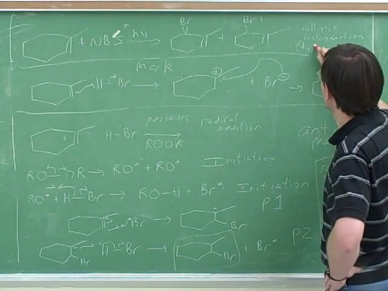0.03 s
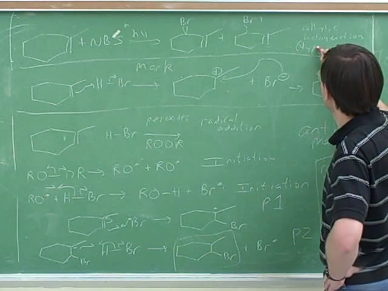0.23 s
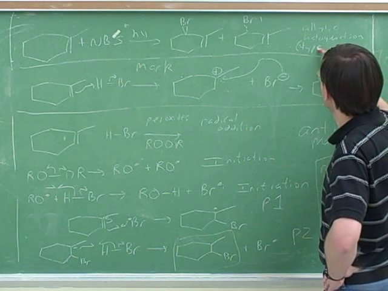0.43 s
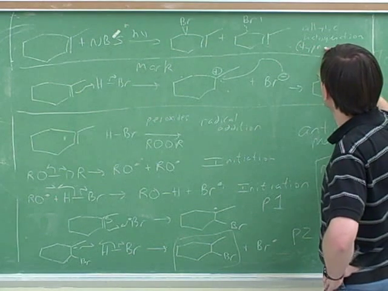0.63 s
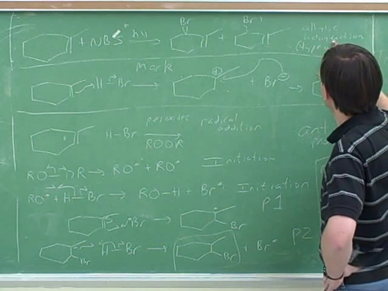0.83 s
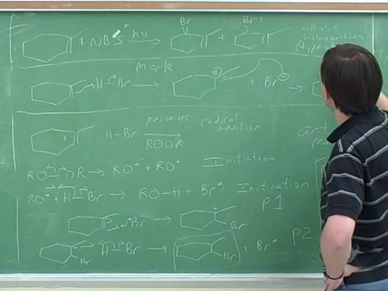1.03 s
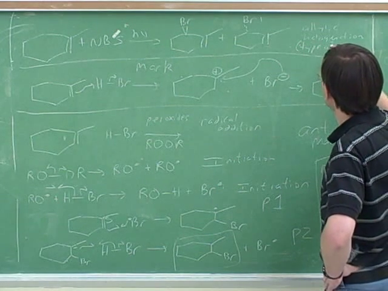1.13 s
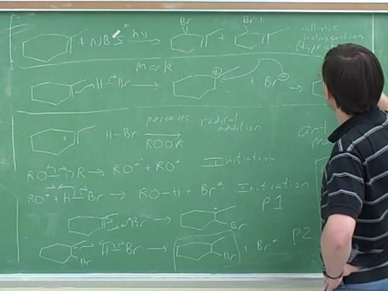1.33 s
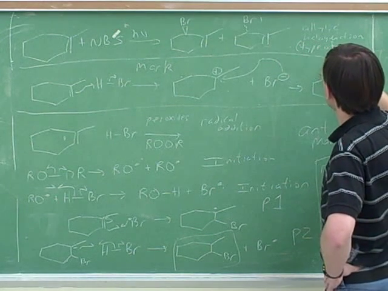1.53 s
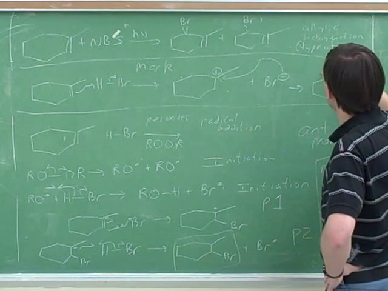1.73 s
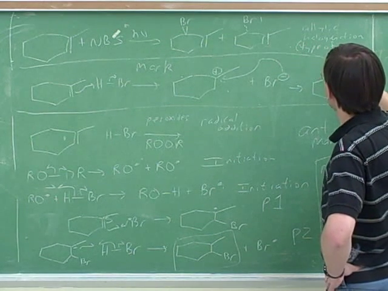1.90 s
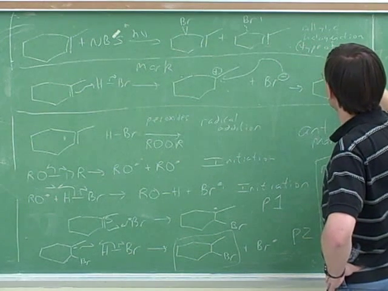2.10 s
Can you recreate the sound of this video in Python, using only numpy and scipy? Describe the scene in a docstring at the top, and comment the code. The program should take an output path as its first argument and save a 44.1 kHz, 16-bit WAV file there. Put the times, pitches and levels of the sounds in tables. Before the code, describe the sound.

Hard chalk taps on a blackboard, bright and clicky with a slight woody board ring, at about 0.05, 0.4, 0.73, 1.05, 1.31, 1.55, 1.84 and 2.12 seconds. The last is duller. Each brings quick echoes and a roughly half-second classroom tail; an earlier tap's tail is fading at the start. Faint ventilation hiss and wavering low rumble continue, with a deep thump around 2.1 seconds. Mono, roomy pickup.

```python
"""In a hard-walled classroom, a stick of chalk taps a blackboard about three times a second.
Each tap is a sharp, short pulse coloured by the ring of board and chalk, plus low board tones that linger.
The room answers with early echoes at set times (filtered pulses with a grainy trail) and a tail of
about half a second (fading noise). Ventilation hiss and low rumble, which ends in a deep thump,
lie beneath (shaped noise)."""
import sys
import numpy as np
from scipy import signal
from scipy.fft import rfft, irfft
from scipy.io import wavfile

SR = 44100
rng = np.random.default_rng(int(sys.argv[2]) if len(sys.argv) > 2 else 0)


def wrap_up_sound(samples):
    """Save the sound to the file named by the first command line argument, as 16-bit audio."""
    columns = np.atleast_2d(samples).T
    # keep every value between -1 and 1, then stretch to whole-number steps
    tamed = np.clip(columns, -1, 1)
    steps = np.round(tamed * 32767).astype(np.int16)
    wavfile.write(sys.argv[1], SR, steps)


N = 95344  # samples of finished sound
LEAD = SR // 2  # samples made before the start, then cut off
LENGTH = int(.7 * SR)  # samples of room answer computed per tap


def from_db(db):
    """Turn decibels into a gain."""
    return 10 ** (np.asarray(db) / 20)


def rms_one(x):
    """Scale a sound so that its average strength (rms) is 1."""
    return x / np.sqrt(np.mean(x ** 2) + 1e-20)


def at_hz(points, hz):
    """Read every column of a table at a frequency, spacing pitches evenly as the ear does."""
    points = np.array(points)
    log_hz = np.log(points[:, 0])
    return [np.interp(np.log(hz), log_hz, column) for column in points[:, 1:].T]


def band_pass(x, edges_hz):
    """Keep mainly the sound between two frequencies."""
    return signal.sosfilt(signal.butter(2, edges_hz, "band", fs=SR, output="sos"), x)


def third_octaves(white, low_hz, count):
    """Cut third-octave slices from two noises in turn; yield each centre frequency and slice."""
    edges = low_hz * 2 ** (np.arange(count + 1) / 3)
    for k, (low, high) in enumerate(zip(edges, edges[1:])):
        yield np.sqrt(low * high), band_pass(white[k % 2], [low, high])


def resonance(x, hz, width_hz):
    """Ring at one frequency, with gain 1 at the peak; a narrower width rings longer."""
    r = np.exp(-np.pi * width_hz / SR)
    feedback = [1, -2 * r * np.cos(2 * np.pi * hz / SR), r * r]
    return signal.lfilter((1 - r * r) / 2 * np.array([1, 0, -1]), feedback, x)


def steep_resonance(x, hz, width_hz):
    """The same resonance twice in a row falls off faster on both sides."""
    return resonance(resonance(x, hz, width_hz), hz, width_hz)


def click(level_db):
    """The most compact pulse with a given spectrum puts its energy first (minimum phase)."""
    cepstrum = irfft(np.log(from_db(level_db)))
    half = len(cepstrum) // 2
    # folding the second half onto the first leaves nothing before the start
    cepstrum[1:half] *= 2
    cepstrum[half + 1:] = 0
    return irfft(np.exp(rfft(cepstrum)))[:half]


# Colour of the steady ventilation noise: f/Hz, relative level per hertz/dB
AIR_COLOUR = [(15, -33), (25, 0), (195, -13.5), (384, -20), (575, -25.5), (1440, -29), (1940, -34),
              (2610, -32), (3340, -34.5), (10700, -38.5), (16000, -39)]
AIR_DB = -57  # overall level of the steady noise


def ventilation():
    """Moving air makes steady noise, built here from slices of noise at different levels."""
    white = rng.standard_normal((2, N + LEAD))
    steady = 0
    for hz, band in third_octaves(white, 27, count=28):
        steady = steady + from_db(at_hz(AIR_COLOUR, hz)[0]) * band
    return from_db(AIR_DB) * rms_one(steady[LEAD:])


# Levels of the low rumble, with a deep thump near the end: t/s, deep band level/dB, upper band level/dB
RUMBLE_LEVELS = [(0, -55, -48.5), (.2, -57, -61), (.3, -63, -65), (.42, -61, -54), (.6, -68, -71),
                 (1.1, -71, -57.5), (1.5, -81, -67.5), (2.06, -68, -66.5), (2.12, -49, -55.5)]
# Edges of the deep band, then of the upper band: lower f/Hz, upper f/Hz
RUMBLE_EDGES = [(35, 49.3), (85, 184)]


def rumble():
    """Two bands of low noise rise and fall, the deep one ending in a sudden thump."""
    out = np.zeros(N)
    s, *levels_db = np.transpose(RUMBLE_LEVELS)
    for edges_hz, level_db in zip(RUMBLE_EDGES, levels_db):
        low = band_pass(rng.standard_normal(N + LEAD), edges_hz)
        level = from_db(np.interp(np.arange(N) / SR, s, level_db))
        out += level * rms_one(low[LEAD:])
    return out


# Room tail: f/Hz, starting level before the rise and lumps/dB, time to fade by 60 dB (t60)/s
ROOM_TAIL = [(185, -13.5, 1), (540, -18, 0.61), (1060, -15.5, 0.6), (1940, -20, 0.58), (2780, -14.5, 0.62),
             (4400, -16, 0.59), (6500, -20.5, .54), (9700, -17.5, .48), (11500, -17.5, 0.47),
             (15000, -19, 0.38)]
TAIL_RISE_MS = 1.33
TAIL_SHARED = 0.59  # share of the noise power common to all taps
TAIL_LUMPY_DB, TAIL_LUMPS_PER_S = 2, 300


def room_tails():
    """Bunched reflections blur into noise, one per tap, each band fading at its own rate in lumps."""
    t = np.arange(LENGTH) / SR
    common = np.sqrt(TAIL_SHARED) * rng.standard_normal((2, 1, LENGTH))
    own = np.sqrt(1 - TAIL_SHARED) * rng.standard_normal((2, len(TAP_LIST), LENGTH))
    out = 0
    for hz, band in third_octaves(common + own, 170, count=20):
        level_db, t60 = at_hz(ROOM_TAIL, hz)
        wander = np.interp(t * TAIL_LUMPS_PER_S, np.arange(LENGTH), rng.standard_normal(LENGTH))
        lumps_db = TAIL_LUMPY_DB * rms_one(wander)
        out = out + band * from_db(level_db + lumps_db - 60 * t / t60)
    return out * (1 - np.exp(-t * 1e3 / TAIL_RISE_MS))


# Delay of each early echo: t/ms
ECHO_DELAYS = [.3, .9, 2.6, 4.4, 7.0, 8.3, 10.8, 15.5, 18.3, 18.6, 22.1, 21.8, 22.2, 31.0, 37.8, 40.0, 42.5,
               45.7, 55.4, 56.9]
# Colour of each echo, in the same order: mean level/dB, centre f/Hz, width of each resonance pass/Hz
ECHO_COLOURS = [(0, 3000, 6000), (2, 6500, 2500), (6, 14200, 4000), (8, 6200, 1200), (7, 850, 600),
                (-3, 11000, 5000), (5, 5200, 1400), (0, 850, 600), (-4, 11000, 4000), (0, 850, 600),
                (-3, 10000, 6000), (3, 4300, 1300), (0, 1900, 1000), (-3, 10000, 5000), (-2, 850, 600),
                (5, 12900, 2000), (0, 850, 600), (-1, 11000, 3000), (3, 6400, 1400), (-1, 6000, 1800)]
ECHO_SCATTER_DB = 1.5  # how much an echo's level varies from tap to tap
ECHO_SMEAR_MS, ECHO_SMEAR_DB = .8, -19  # fade time and starting level of the grainy trail


def echoes():
    """Surfaces send back coloured copies with a grainy trail, a little different for each tap."""
    out = np.zeros((len(TAP_LIST), LENGTH))
    t = np.arange(512) / SR
    for ms, (db, hz, width_hz) in zip(ECHO_DELAYS, ECHO_COLOURS):
        grains = rng.standard_normal((len(TAP_LIST), len(t)))
        trail = from_db(ECHO_SMEAR_DB) * grains * np.exp(-t * 1e3 / ECHO_SMEAR_MS)
        gain = from_db(db + ECHO_SCATTER_DB * rng.standard_normal((len(TAP_LIST), 1)))
        pulse = t == 0  # one sample
        i = int(ms * SR / 1e3)
        out[:, i:i + len(t)] += gain * steep_resonance(trail + pulse, hz, width_hz)
    return out


# Low tones of the board that linger: f/Hz, mean starting level/dB, time to fade by 60 dB (t60)/s
BOARD_TONES = [(505, -45, .3), (655, -43, .3), (780, -44, .3), (821, -42, .3), (863, -43, .3),
               (919, -41, .3), (998, -42, .3), (1126, -44, .3), (1888, -45, .25), (2000, -46, .25)]
BOARD_SCATTER_DB = 2.5  # how much a tone's strength varies from tap to tap


def board():
    """The struck board rings in fading tones, each with a strength of its own at every tap."""
    t = np.arange(LENGTH) / SR
    hz, db, t60 = np.transpose(BOARD_TONES)[:, :, None]
    tones = np.sin(2 * np.pi * hz * t) * from_db(db - 60 * t / t60)
    strengths = from_db(BOARD_SCATTER_DB * rng.standard_normal((len(TAP_LIST), len(BOARD_TONES))))
    return strengths @ tones


# Taps, the first before the start: t/s, extra level of the direct crack/dB,
# then one strength for each pitch of TAP_PITCHES: level/dB
TAP_LIST = [(-.17, 0, -2, -11, -1.5, -7, -8.5, -7.5, -11.5, -12),
            (0.0537, 0.86, -13, -15.5, -12.5, -11.5, -9, -8, -11, -14.5),
            (0.3998, 1, -14, -15, -12.5, -12, -12.5, -7, -10, -11.5),
            (0.7314, -1.3, -12.5, -13, -12.5, -14, -12.5, -12, -14.5, -20),
            (1.0483, -1.6, -10.5, -10, -9, -10.5, -11, -11, -11, -15.5),
            (1.31, -0.36, -11, -13, -10.5, -12, -11.5, -10.5, -13, -16.5),
            (1.5474, -2.9, -11.5, -13, -8, -9.5, -10.5, -7, -8.5, -9),
            (1.8389, -1.4, -12.5, -13, -10.5, -14, -12.5, -11.5, -15.5, -20),
            (2.1200, -2.3, -13, -10.5, -11.5, -15.5, -13, -20, -18.5, -26)]
# Pitches at which each tap has its own strength: f/Hz
TAP_PITCHES = [500, 950, 2000, 3000, 4200, 6000, 9000, 13500]
# Ring of board and chalk, common to all taps: f/Hz, level/dB
BODY_RING = [(150, -7.5), (300, -7.5), (500, -0.5), (750, -1), (1020, 2), (1150, -5.5), (1350, -5),
             (1900, -0.5), (2400, -9), (2900, -12.5), (3450, -9.5), (3750, -5.5), (4300, -1.5), (5200, 0.5),
             (6300, 3), (7400, -3), (8500, -8.5), (12500, -8.5), (14000, -12), (16000, -11)]
# Extra colour of the direct path: f/Hz, level/dB
DIRECT_COLOUR = [(300, 7), (1000, 6.5), (3000, 12), (6000, 0.5), (10000, 13), (15000, 9)]


def chalk():
    """Each tap is a coloured pulse, heard directly and through board and room."""
    room = echoes() + room_tails() + board()
    out = np.zeros(LEAD + N + 2 * LENGTH)
    hz = np.linspace(1, SR / 2, 1025)
    body_db = at_hz(BODY_RING, hz)[0]
    direct = click(at_hz(DIRECT_COLOUR, hz)[0])
    for (s, crack_db, *strengths_db), paths in zip(TAP_LIST, room):
        tap_db = at_hz(np.transpose([TAP_PITCHES, strengths_db]), hz)[0]
        pulse = click(body_db + tap_db)
        sound = signal.fftconvolve(pulse, paths)
        crack = from_db(crack_db) * signal.fftconvolve(pulse, direct)
        sound[:len(crack)] += crack
        i = LEAD + int(s * SR)
        out[i:i + len(sound)] += sound
    return out[LEAD:LEAD + N]


def scene():
    """Chalk taps over ventilation noise and low rumble, in one channel."""
    return (chalk() + ventilation() + rumble())[None]


MIC_LOW_HZ, CUTOFF_HZ = 36, 15850


def record(dry):
    """The microphone loses the deepest bass, and a steep filter cuts the top."""
    low_cut = signal.butter(2, MIC_LOW_HZ, "high", fs=SR, output="sos")
    top_cut = signal.ellip(12, .2, 75, CUTOFF_HZ, fs=SR, output="sos")
    return signal.sosfilt(top_cut, signal.sosfilt(low_cut, dry))


dry = scene()
out = record(dry)
wrap_up_sound(out)
```